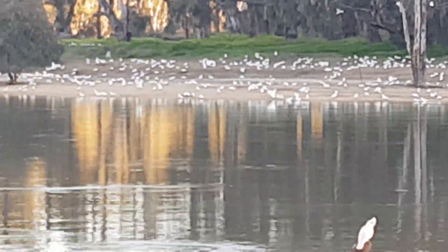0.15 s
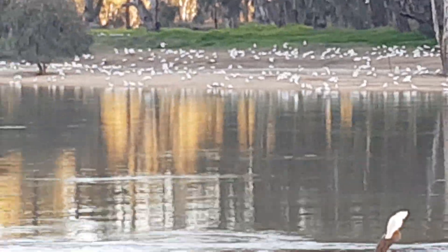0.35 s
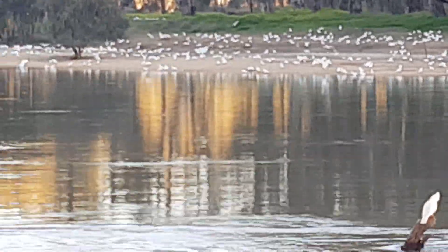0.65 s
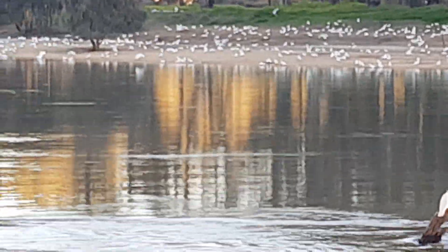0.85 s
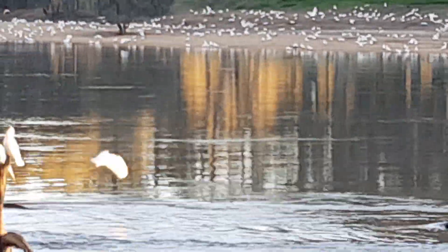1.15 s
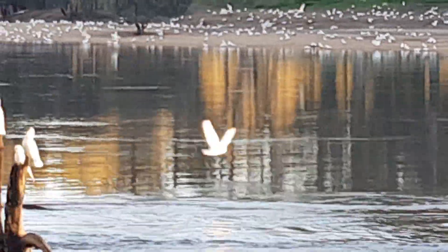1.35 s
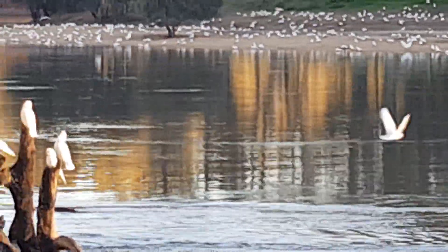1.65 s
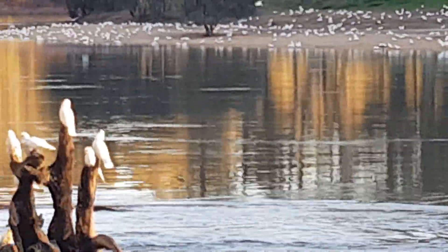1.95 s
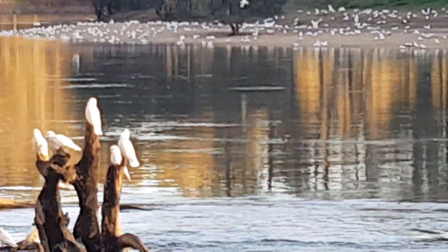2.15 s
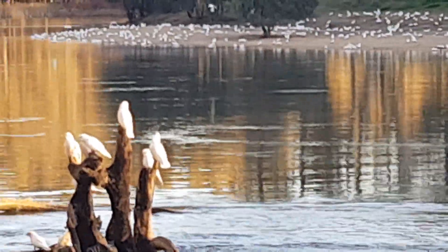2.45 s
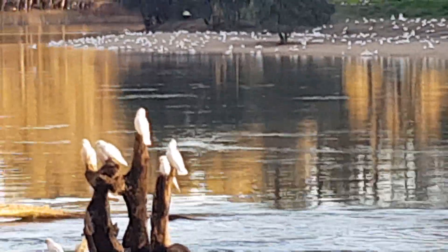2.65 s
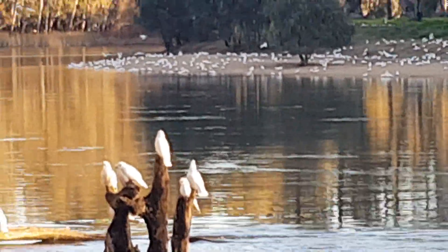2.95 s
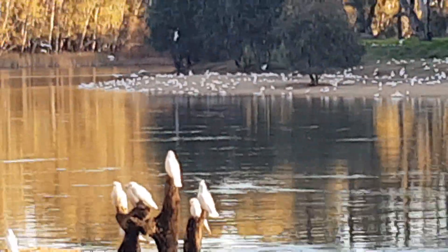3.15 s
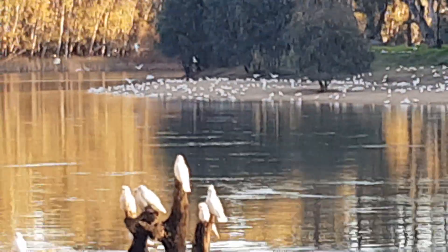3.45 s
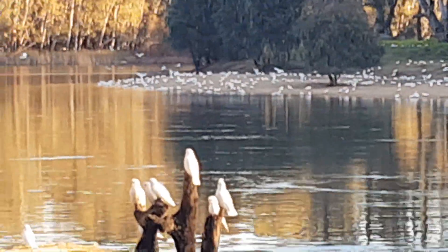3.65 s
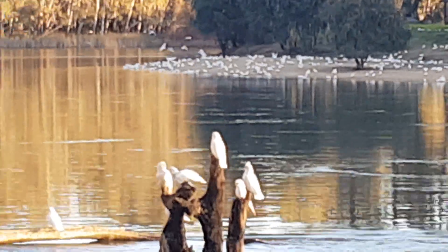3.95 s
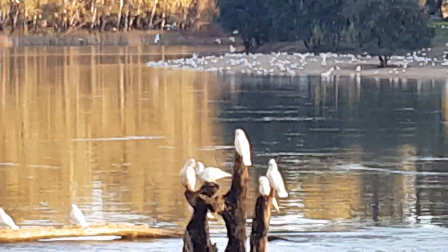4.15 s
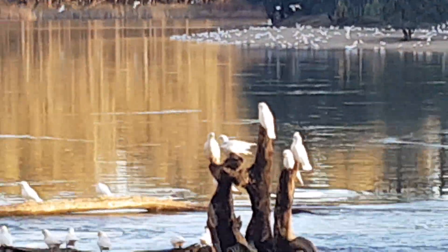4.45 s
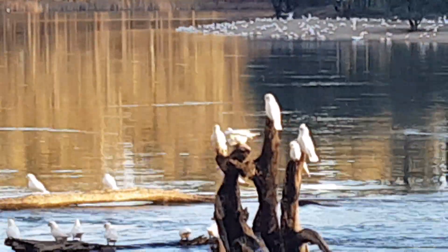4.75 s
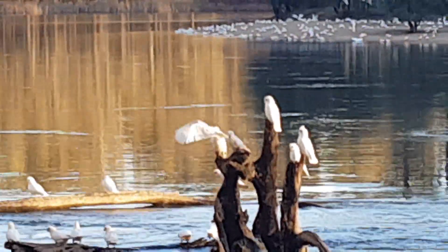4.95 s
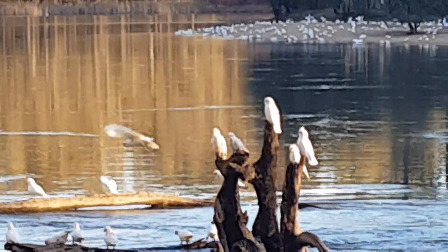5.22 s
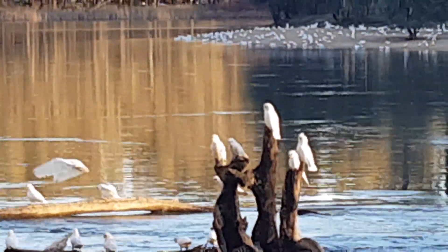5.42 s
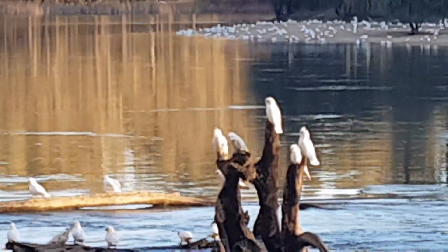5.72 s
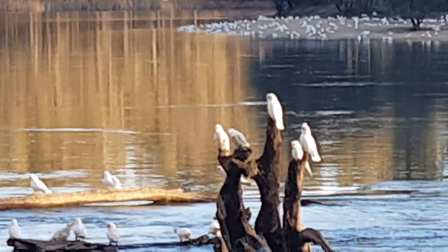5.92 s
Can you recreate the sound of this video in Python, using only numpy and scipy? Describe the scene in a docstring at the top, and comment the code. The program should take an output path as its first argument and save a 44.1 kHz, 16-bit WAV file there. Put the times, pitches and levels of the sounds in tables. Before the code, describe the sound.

A noisy flock of white parrots at a riverbank: strong grating squawks open the scene, followed by clusters of brief gliding yelps and longer rough screeches. Hundreds of distant calls melt into a constant din from the far bank. Beneath lie a receding motor hum and soft bass rumble, and a tiny dull knock near the small stereo microphone comes at the very end.

```python
"""White parrots by a river

Near birds screech harshly or give short clear yodels, each from two pulsing membranes or one, shaped by a throat.
Behind them lie the blurred din of many random far calls from the other bank, a fading engine drone
whose pitch sinks, a low hum, a noise rumble and one soft knock near the microphone.
Two microphone ports a few centimetres apart hear each bird at its own delay."""
import sys
import numpy as np
from scipy import signal
from scipy.fft import rfft, irfft, next_fast_len
from scipy.io import wavfile
from scipy.ndimage import uniform_filter1d

SR = 44100
rng = np.random.default_rng(int(sys.argv[2]) if len(sys.argv) > 2 else 0)


def to_wav(sig):
    """Store sig (one row per channel, or 1-D mono) as 16-bit WAV at the path in sys.argv[1].

    Samples outside -1..1 are clipped; the rate is SR.
    """
    pcm = np.clip(np.atleast_2d(sig), -1, 1) * 32767
    pcm = np.round(pcm).astype(np.int16)
    wavfile.write(sys.argv[1], SR, pcm.T)  # frames by channels


N = 268128

# Windpipe and beak of a near bird: (frequency [Hz], level [dB])
THROAT = [(290, -58), (500, -62), (696, -11.5), (828, -12), (1240, -9), (1580, -5), (1960, -5.5),
          (2270, -1.5), (2940, -5), (3340, -3.5), (3980, -10.5), (6300, -17.5), (7490, -29), (9570, -23.5),
          (15600, -48.5)]
# Harsh calls of the near birds, levels before echo: (start [s], length [s], peak effort [dB], peak time [share of length],
# depth under the peak at start [dB], at end [dB], throb [dB], roughness before locking [0-1],
# pitch [Hz], clean rising start [s], second membrane pitch [Hz], its level [dB],
# sag of pitch and gape at start [share], at end [share], lower throat peak [Hz], upper [Hz], their levels [dB], [dB],
# lead of the left port in the bass [ms], treble tilt [dB per octave, reached far above 3500 Hz],
# beak peak [Hz], its level [dB], treble dip [Hz], its level [dB], lower throat peak width [Hz], hiss crackle [dB])
SCREECHES = [ (.09, 0.38, -25, 0.55, 8.1, 6.1, 0.23, 0.82, 1321, 0.0121, 1251, -6, 0.062, 0.048, 2730, 3650, 11, 7.5, 0.15, 6, 10900, 3, 9900, -11, 260, 7.7),
             (.43, 0.21, -25.5, 0.22, 3.9, 5.7, 0, 0.88, 1273, 0.0065, 1196, 4, 0.00026, 0.041, 2640, 3560, 8.1, 7.4, 0.16, 4, 10600, 3.3, 9700, -14, 260, 8.8),
             (1.17, 0.29, -34, 0.46, 10, 2.8, 0, 0.549, 1135, 0.018, 782, -16, -0.028, -0.0028, 2230, 3200, 2.1, 8.6, 0.17, 4, 10300, 2.9, 11500, -3, 300, 4),
             (1.6, 0.6, -32, 0.39, 6.5, 10.5, 0.91, 0.78, 1128, 0.061, 921, -6.5, 0.081, 0.042, 2750, 3320, 5, 4.4, 0.17, 2.5, 6770, 1.3, 10800, -1, 260, 3.4),
             (2.67, 0.71, -28.5, 0.49, 5.2, 19, 0.4, 0.96, 1134, .012, 1290, -3, 0.039, 0.084, 2580, 3370, 5.7, 6.9, 0.16, -1.5, 14400, 7.4, 11300, -2, 403, 5.6),
             (3.535, 0.32, -38.5, 0.3, 16, .1, 0.95, 0.85, 1112, 0.02, 949, -11, 0.01, 0.036, 1900, 3500, 6.2, 6.5, 0.28, -0.5, 9250, 1.3, 11500, -2, 250, 2.7),
             (3.79, .89, -30.5, .16, 7.2, 4.9, 0.4, .85, 1124, .08, 1342, -14, .03, -.03, 2870, 3470, 8.1, 4.5, 0.15, 2, 8700, 2.1, 11500, 1, 300, 3),
             (4.2, .38, -34, 0.44, 8, 11, 0, 0.82, 1308, 0.011, 1205, -7, .12, 0.11, 2700, 3970, 3, 12, 0.19, -11, 9700, 2, 11500, -2, 230, 3),
             (4.88, 0.49, -27.5, 0.28, 7.3, 4, 0.3, 0.92, 1180, 0.011, 1314, -1.5, 0.029, 0.028, 2520, 3400, 4.3, 6.3, 0.23, -0.5, 13500, 4.3, 11300, 2, 390, 3),
             (5.37, 0.31, -34, 0.12, .1, 7, 0.71, 0.87, 1108, 0.01, 1272, -4, 0.0062, 0.039, 2170, 3340, 6.3, 13, 0.15, 1, 9300, 1.2, 11500, 1, 250, 3),
             (5.8, .28, -42, 0.405, 4, 2, 0, .9, 1131, .01, 1256, -11, 0.032, .02, 2296, 3300, 4.2, 3.9, .17, 1, 9800, 2.2, 11500, -7, 300, 3.3),
             ]
THROB_HZ, SCREECH_EDGE_S = 7.25, 0.024  # pulsing of the breath, fade at both ends
SWELL_BEND = 2.15  # effort changes fastest near the ends
SWAY_DB, STRAY = 0.04, 0.032  # chance in effort and share of pitch, both before smoothing
RASP_FLUTTER_DB = 0.75


def screeches():
    """Harsh calls of two membranes: a clean upward glide breaks into chaos; effort, pitch and gape swell and sag."""
    out = np.zeros((2, N))
    for (s, length, peak_db, peak, start_db, end_db, throb_db, rough, pitch_hz, rise_s, other_hz, other_db,
         start_sag, end_sag, *bird, width_hz, crackle_db) in SCREECHES:
        t = np.arange(0, length, 1 / SR)
        top = np.clip(peak, 0.02, 0.98) * length
        away = np.interp(t, [0, top, length], [1, 0, 1])  # distance from the peak of effort
        effort_db = peak_db - np.where(t < top, start_db, end_db) * away ** SWELL_BEND
        effort_db += throb_db * np.cos(2 * np.pi * THROB_HZ * (t - top))
        effort_db += SWAY_DB * uniform_filter1d(wander(len(t), 3.0), size=600)

        after_rise = np.clip(t / rise_s - 1, 0, 1)
        stray = [STRAY * after_rise * uniform_filter1d(wander(len(t), 8), size=400) for _ in range(3)]
        bend = 1 - np.where(t < top, start_sag, end_sag) * away
        glide = bend * (0.82 + 0.18 * np.minimum(t / rise_s, 1))
        locking = 1 + 0.25 * wander(len(t), 15)  # the membranes fall in and out of step
        rough = np.clip(rough * locking, 0.5, 1.1) * np.clip(4 * t / rise_s - 3.5, 0.13, 1)

        folds = syrinx(pitch_hz * (glide + stray[0]), rough, crackle_db)
        second = syrinx(other_hz * (glide + stray[1]), rough, crackle_db)
        folds += amp(other_db) * after_rise * second
        gape = bend + stray[2] / 2
        call = mouth(folds, RASP_FLUTTER_DB, gape, *bird[:4], width_hz)
        voice = heard(call, THROAT, 0, 0, 0, 0, *bird[4:])  # mouth has already set the throat peaks
        add(out, s, amp(effort_db) * voice * edges(len(t), SCREECH_EDGE_S))
    close_echo = trees(out, t60=0.035, bright=0.95)
    return out + amp(-2.5) * trees(out) + amp(5) * close_echo


# Clear notes of the near birds, levels before echo: (start [s], length [s], pitch at start [Hz], at turn [Hz],
# at end [Hz], turn [share of length], effort [dB], swell from start to end [dB],
# lower throat peak [Hz], upper [Hz], their levels [dB], [dB], lead of the left port in the bass [ms],
# treble tilt [dB per octave, reached far above 3500 Hz])
YODELS = [ (.625, 0.055, 837, 915, 1016, 0.49, -39.5, -3, 2750, 4000, 10, 1, 0.26, -5),
          (.718, 0.038, 814, 920, 945, 0.35, -44, 1, 2760, 4000, 10, 1, 0.31, 3),
          (.665, 0.036, 790, 813, 810, 0.58, -42, 0, 2450, 3200, 5, 1, 0.34, -2),
          (.93, 0.087, 1120, 1078, 1200, .4, -45.5, -1, 2270, 3400, 7, 1, 0.28, -7),
          (1.03, 0.05, 1055, 1024, 1010, 0.55, -51, -2, 2060, 3100, 6, 1, 0.23, -6),
          (1.101, 0.047, 965, 930, 920, .4, -49, -3, 2800, 3700, 9, 1, 0.15, -14),
          (1.27, 0.15, 774, 735, 796, 0.51, -48.5, 4, 760, 1540, 13, 1, .1, -14),
          (1.59, 0.086, 992, 1052, 1038, 0.39, -36, 3, 2010, 4200, 16, 13, 0.15, 0),
          (1.681, 0.037, 1024, 994, 996, 0.66, -31.5, -2, 1970, 4070, 14.5, 14.6, 0.16, 12.5),
          (1.73, 0.034, 1000, 987, 945, .5, -36, -2, 2950, 4000, 10, 1, 0.074, -3),
          (1.765, 0.14, 1092, 1107, 1050, 0.7, -33, 1.5, 2170, 3330, 15, 6, 0.14, 0),
          (1.903, .032, 1090, 1095, 1100, .5, -45, 0, 3270, 4400, 9, 1, 0.24, -3),
          (2.213, 0.051, 834, 838, 812, 0.43, -39, 6, 2480, 4792, 12, 1, -.23, -5),
          (2.255, 0.052, 805, 790, 804, 0.5, -35, -2, 2400, 4800, 6, 13, -0.22, -4.5),
          (2.32, 0.071, 1190, 1330, 1280, 0.65, -38.5, 0, 2580, 3900, 15, 1, 0.2, -5),
          (2.3, 0.046, 791, 746, 702, 0.38, -37.5, 1, 3600, 6030, 6.5, 1, -0.27, -1),
          (2.345, 0.053, 783, 799, 773, 0.57, -36, 0, 2400, 4870, 4.5, 7.3, -0.38, -3),
          (2.388, 0.027, 768, 700, 636, 0.53, -38.5, -6, 1400, 3450, 10, 5.5, -0.22, -9),
          (2.54, .07, 770, 824, 873, 0.57, -44, 8, 2570, 5100, 9, 13, 0.32, -16),
          (2.625, 0.075, 776, 850, 910, 0.36, -41, 11, 2600, 5200, 6, 7, 0.31, -1.5),
          (3.2, .1, 1117, 1040, 895, 0.485, -45, 2, 950, 2000, 14, 1, 0.21, -12),
          (3.33, 0.066, 1200, 1230, 1200, 0.69, -50, 7, 2420, 3700, 5, 5.2, 0.24, -11),
          (3.42, .07, 1190, 1190, 1150, .5, -65, -2, 2380, 3600, 8, 1, 0.18, -15),
          (4.06, 0.091, 652, 652, 654, .5, -35.5, 0, 1300, 2600, 6, 4, 0.2, -18),
          (4.15, 0.24, 656, 650, 625, 0.52, -32, -2, 2620, 3200, 7.5, 9.6, 0.22, -15),
          (4.42, 0.2, 621, 620, 625, 0.53, -45, 4, 1830, 2540, 6, 1.8, 0.14, 0),
          (4.655, 0.086, 822, 811, 863, 0.43, -29.5, -1, 2400, 3260, 5.5, 4.4, -0.21, -1.5),
          (4.678, 0.041, 944, 1080, 1010, 0.63, -32, -7, 2100, 5420, 8, 18, 0.175, -2),
          (4.75, 0.046, 990, 1014, 886, 0.4, -38.5, -5, 2010, 4000, 3, 3.1, 0.15, 0),
          (4.737, 0.08, 789, 830, 817, 0.47, -31.5, -1, 2600, 3270, 0, 3.7, -0.272, 2),
          (4.81, 0.055, 810, 760, 690, 0.46, -43, -2, 1500, 2300, 4, 3, -0.13, 4),
          (4.848, 0.054, 923, 1040, 1155, 0.43, -33, 11, 2930, 4170, 4, 7.6, 0.25, 0.5),
          (5.321, 0.088, 598, 659, 668, 0.46, -35, -6, 1320, 3440, 4.5, 3.2, 0.18, -1),
          (5.44, 0.13, 651, 640, 576, 0.71, -36, 2, 1260, 2600, 6, 7.5, 0.2, -6),
          (5.666, 0.059, 860, 828, 757, 0.58, -35, 5, 3150, 4300, 11, 1, -.39, 3),
          (5.712, 0.11, 792, 935, 783, 0.47, -34.5, 2, 2660, 5230, 9.5, 5, -0.26, 5.5),
          (5.812, 0.055, 747, 696, 697, 0.41, -34.5, -8, 2820, 4900, 9, 7.6, -0.31, 0),
          (5.872, 0.067, 1090, 1132, 1085, 0.42, -39.5, -9, 2200, 3260, -4, 2.2, -0.33, -4),
          (5.94, 0.081, 729, 738, 646, 0.43, -40, 7, 2350, 3200, 6, 2, 0.22, -11),
          (6.025, 0.059, 866, 862, 720, 0.21, -34.5, 3, 2400, 3220, -2, 6.2, -0.27, -3), ]
YODEL_EDGE_S, YODEL_FLUTTER_DB = 0.0036, 1.3
WARBLE = 0.011  # share by which the pitch trembles, before smoothing


def yodels():
    """Clear notes that glide to a turning pitch and on, from birds over open water, with little echo."""
    out = np.zeros((2, N))
    for s, length, start_hz, turn_hz, end_hz, turn, effort_db, swell_db, *bird in YODELS:
        u = np.linspace(0, 1, round(length * SR))
        hz = np.interp(u, [0, np.clip(turn, 0.05, 0.95), 1], [start_hz, turn_hz, end_hz])
        tremble = 1 + WARBLE * uniform_filter1d(wander(len(u), 67), size=150)
        hz = uniform_filter1d(hz, size=600, mode="nearest") * tremble
        call = mouth(syrinx(hz, 0.085, count=20), YODEL_FLUTTER_DB)
        voice = heard(call, THROAT, *bird)
        sway_db = 1.4 * uniform_filter1d(wander(len(u), 30), size=200)
        level_db = effort_db + swell_db * (u - 0.5) + sway_db
        add(out, s, amp(level_db) * voice * edges(len(u), YODEL_EDGE_S))
    return out + amp(-12) * trees(out)


def syrinx(hz, rough, crackle_db=0, count=14):
    """Membrane pulses; roughness shakes their pitch and strength, lets half tones and crackling hiss in."""
    size = len(hz)
    shake = 0.1174 * wander(size, 408.0) + 0.035 * wander(size, 30.54)
    turns = np.cumsum(hz * (1 + rough * shake + 0.00395 * wander(size, 39.5))) / SR
    pulses = sum(np.cos(2 * np.pi * k * turns) * (k * hz < SR / 2.5) for k in range(1, count))
    half_tone = 0.04 * np.cos(np.pi * turns)
    uneven = 1 + rough * (0.76 * wander(size, 480) + 0.073 * wander(size, 4.7) + half_tone)
    puffs = 0.97 + np.exp(-(turns % 1) / 1.3)  # air is strongest as each pulse begins
    hiss = puffs * rng.standard_normal(size) * amp(crackle_db * wander(size, 230))
    return evened(pulses * uneven) + 0.65 * rough ** 2 * evened(hiss)


def mouth(x, flutter_db, bend=(1, 1), low_hz=2000, high_hz=3000, low_db=0, high_db=0, width_hz=250):
    """Two throat peaks slide with the gape; moving air makes patches of the voice flutter, most in the treble."""
    hz, t, z = signal.stft(x, SR, nperseg=512, noverlap=384, padded=True)
    bend = np.interp(t, np.linspace(0, len(x) / SR, len(bend)), bend)
    hz = hz[:, None]
    patches = uniform_filter1d(rng.standard_normal(z.shape[::-1]), size=7, axis=0)
    patches = evened(uniform_filter1d(patches, size=4, axis=1)).T
    peaks_db = low_db * np.exp(-((hz - low_hz * bend) / width_hz) ** 2)
    peaks_db = peaks_db + high_db * np.exp(-((hz - high_hz * bend) / (1.11 * width_hz)) ** 2)
    air_db = flutter_db * (0.5 + (hz / 6000) ** 2) * patches
    return signal.istft(z * amp(peaks_db + air_db), SR, nperseg=512, noverlap=384)[1][:len(x)]


def heard(x, colour, low_hz, high_hz, low_db, high_db, lead_ms, tilt_db,
          beak_hz=5800, beak_db=-5, dip_hz=9000, dip_db=0):
    """Colours a voice by its throat, tilts its treble by distance and aim, delays one port against the other."""
    size = next_fast_len(len(x) + 400)
    hz = np.fft.rfftfreq(size, 1 / SR)
    peaks_db = low_db * np.exp(-((hz - low_hz) / 260) ** 2)
    peaks_db += high_db * np.exp(-((hz - high_hz) / 330) ** 2)
    peaks_db += beak_db * np.exp(-((hz - beak_hz) / 1500) ** 2)
    peaks_db += dip_db * np.exp(-((hz - dip_hz) / 650) ** 2)
    peaks_db -= 0.38 * dip_db * np.exp(-((hz - 0.87 * dip_hz) / 350) ** 2)  # opposite bend just under the dip
    z = rfft(x, size) * amp(read(colour, hz) + peaks_db + tilt_db * np.log2(1 + hz / 3500))
    side = np.array([[-0.5], [0.5]]) * lead_ms
    late_s = side * (1 + 0.64 * hz / (hz + 6000))  # treble bends round the housing
    late_s = (1 + late_s) / 1000
    shadow = amp(-6 * side * np.log2(1 + hz / 3000))  # the far port is duller
    return evened(irfft(z * shadow * np.exp(-2j * np.pi * hz * late_s), size)[:, :len(x)])


def edges(size, s):
    """A flat window with soft ends s seconds long."""
    return signal.windows.tukey(size, min(2 * s * SR / size, 1))


def trees(x, t60=0.2, dull=-0.35, bright=0):
    """Scattered echoes from water, trunks and banks, other ones at each port; dull below 0 brightens them."""
    t = np.arange(SR // 2) / SR
    strength = rng.standard_normal((2, len(t)))
    sparse = rng.random((2, len(t))) < 0.05
    taps = strength * sparse * amp(-60 * t / t60) * (t > 0.002)
    taps = signal.lfilter([1, -bright], [1, -np.clip(dull, -0.9, 0.9)], taps)
    return signal.fftconvolve(x, taps / np.linalg.norm(taps, axis=1, keepdims=True), axes=1)[:, :N]


# A soft knock near the microphone: (time [s], level before its onset and decay [dB])
BUMP = [(6.004, -37)]


def bump():
    """A short dull knock: a 330 Hz sine that dies away by 60 dB in 0.03 s."""
    out, t = np.zeros((2, N)), np.arange(2000) / SR
    for s, db in BUMP:
        knock = amp(db - 60 * t / 0.03) * np.sin(2 * np.pi * 330 * t) * (1 - np.exp(-t / 0.00069))
        add(out, s, np.array([knock, knock]))
    return out


# Din of the flock on the far bank: (time [s], level [dB])
FLOCK = [(0, -30), (.6, -40.5), (1.3, -37.5), (2.5, -40.5), (2.95, -33), (3.45, -39.5), (4.5, -33.5),
         (5.5, -36), (5.8, -32.5), (6.08, -33.5)]
# Colour of the din across the water: (frequency [Hz], level [dB])
FAR = [(240, -35), (400, -20.5), (596, -9), (643, -7.5), (674, -1.5), (785, -3.5), (888, -7), (1020, -6),
       (1410, -4), (1780, -8), (2090, -0.5), (2400, -0.5), (2940, -5.5), (3550, -5.5), (4050, -11),
       (5420, -16), (7830, -31), (15600, -35)]


def flock(count=220):
    """Many far birds call at random, each an arched note, melting into a din."""
    out = np.zeros((2, N))
    for at, pitch, length, rough, size, side in rng.random((count, 6)):
        u = np.linspace(0, 1, round((0.06 + 0.24 * length ** 2) * SR))
        hz = (620 + 560 * pitch ** 1.5) * (1 - 0.7 * (u - 0.45) ** 2)
        folds = syrinx(hz, 0.053 + 0.598 * rough ** 2, count=7)
        voice = heard(folds, FAR, 930, 2420, -4.5, 1.9, 0.923 * side - 0.45, 0)
        add(out, at * N / SR, amp(7.5 * size ** 3) * voice * signal.windows.tukey(len(u), 0.3))
    calls = evened(out + 0.65 * trees(out, t60=0.7, dull=0.5))
    din = 0.85 * calls + 0.52 * diffuse(FAR, 2.4)
    return amp(curves(FLOCK)[1][0][:N]) * din[:, :round(FLOCK[-1][0] * SR)]


# Receding engine: (time [s], frequency of the ninth order [Hz], level [dB])
DRONE = [(0, 186.8, -53), (.26, 186.4, -45.5), (.7, 184.5, -53), (.9, 184.5, -45), (1.5, 182.8, -51.5),
         (2.1, 180.5, -59), (2.9, 177.5, -57), (3.5, 175.5, -59.5), (4.6, 174.5, -63.5), (6.08, 174, -75)]
# Its lines: (order [multiple of the turning rate], level [dB], rounded to whole dB when played)
ENGINE = [(6, -25), (8, -15.5), (9, 0), (11, -16.5), (12, -34)]


def engine_drone():
    """Low lines on one speed curve, each wavering in strength."""
    out, (s, (hz, db)) = np.zeros((2, N)), curves(DRONE)
    turn = 2 * np.pi * np.cumsum(hz) / SR / 9
    line = sum(np.sin(k * turn) * amp(db + k_db + 2.15 * wander(len(hz), 9.9))
               for k, k_db in np.round(ENGINE, 0))
    add(out, s, np.sqrt(2) * np.array([line, line]) * signal.windows.tukey(len(hz), 0.01))
    return out


# Low hum: (time [s], level [dB])
THRUM = [(0, -55), (.8, -53.5), (1.3, -61.5), (3, -61.5), (3.8, -51.5), (4.15, -64), (4.5, -50.5),
         (6.08, -52)]
THRUM_HZ, THRUM_DRIFT_HZ, THRUM_WAVER_DB = 67.6, 2.52, -0.5  # centre; rms drift; scale of the level's chance


def thrum():
    """A low hum, one sine that drifts in pitch and wavers in strength."""
    db = curves(THRUM)[1][0][:N]
    waver, drift = [evened(uniform_filter1d(wander(N, 2.52), size=2000)) for _ in range(2)]
    turn = 2 * np.pi * np.cumsum(THRUM_HZ + THRUM_DRIFT_HZ * drift) / SR
    line = np.sqrt(2) * amp(db + THRUM_WAVER_DB * waver) * np.sin(turn)
    return np.array([line, line])


# Low rumble of the place, before the ports drop the deepest bass: (frequency [Hz], level [dB])
RUMBLE = [(14, -54), (24, 14), (49, 1.5), (69, 1.5), (92, -8), (108, -5), (145, -9), (179, -8.5),
          (280, -15), (315, -15.5), (423, -22.5), (520, -18.5), (680, -10.5), (1140, -120)]
RUMBLE_DB = -48


def rumble():
    """Steady diffuse noise, almost all of it in the bass."""
    return amp(RUMBLE_DB) * diffuse(RUMBLE, 0.13, size=4096)


# Diffuse sound at the two ports: (frequency [Hz], left-right likeness [0-1])
SAME = [(40, .995), (125, 1), (300, 0.74), (600, 0.53), (2000, 0.009)]


def diffuse(colour, patchy_db, size=1024):
    """Random short-time spectra with drifting patches, alike in both ports only in the bass."""
    frames, hz = 4 * N // size + 5, np.fft.rfftfreq(size, 1 / SR)
    a, b, c, d, patches = rng.standard_normal((frames, len(hz), 5)).T
    patches = evened(uniform_filter1d(uniform_filter1d(patches, size=6, axis=0), size=16, axis=1))
    same = np.clip(read(SAME, hz), -1, 1)[:, None]
    left, other = a + 1j * b, c + 1j * d
    z = np.array([left, same * left + np.sqrt(1 - same ** 2) * other])
    z *= amp(read(colour, hz)[:, None] + patchy_db * patches)
    return evened(signal.istft(z, nperseg=size, noverlap=size * 3 // 4)[1][:, :N])


def amp(db):
    """Decibels to gain."""
    return 10 ** (np.asarray(db) / 20)


def evened(x):
    """Scales to rms 1."""
    return x / np.sqrt(np.mean(x ** 2) + 1e-20)


def wander(size, hz):
    """Chance of rms 1: noise through a one-pole low-pass at hz."""
    return evened(signal.lfilter([1], [1, -np.exp(-2 * np.pi * hz / SR)], rng.standard_normal(size)))


def read(points, hz):
    """Reads a spectrum on a log-frequency axis."""
    f, value = np.transpose(points)
    return np.interp(np.log(hz + 1), np.log(f + 1), value)


def curves(rows):
    """Start time and the columns of a table at sample rate."""
    s, *columns = np.transpose(rows)
    return s[0], [np.interp(np.arange(s[0], s[-1], 1 / SR), s, c) for c in columns]


def add(mix, s, sound):
    """Mixes a stereo sound in at time s."""
    part = mix[:, round(s * SR):][:, :sound.shape[1]]
    part += sound[:, :part.shape[1]]


def scene():
    """Near birds, the knock, the flock across the water, and the low sounds."""
    mix = screeches() + yodels() + bump()
    add(mix, 0, flock())
    return mix + engine_drone() + thrum() + rumble()


# Colour of the two microphone ports: (frequency [Hz], left over right [dB])
PORTS = [(60, 2.5), (92, -5), (140, 3.5), (210, 1), (330, 0.5), (500, 3.5), (770, 0.5), (1170, 3),
         (1790, 0.5), (2740, 5.5), (4190, 1.5), (6410, -8), (9810, -4.5), (15000, -6)]
EDGE_HZ = 15760  # upper band limit


def record(dry):
    """Each port has its own colour and drops the deepest bass; then the band limit."""
    hz = np.fft.rfftfreq(N, 1 / SR)
    colour = amp(np.array([[0.5], [-0.5]]) * read(PORTS, hz))
    bass_cut = 1 + (42 / (hz + 1)) ** 8
    ports = irfft(rfft(dry) * colour / bass_cut, N)
    low_pass = signal.firwin(2047, EDGE_HZ, window=("kaiser", 9), fs=SR)
    return signal.oaconvolve(ports, low_pass[None], "same")


dry = scene()
out = record(dry)
to_wav(out)
```